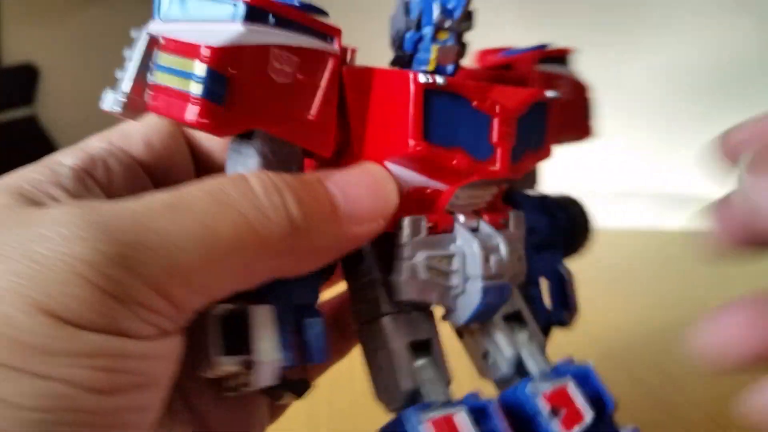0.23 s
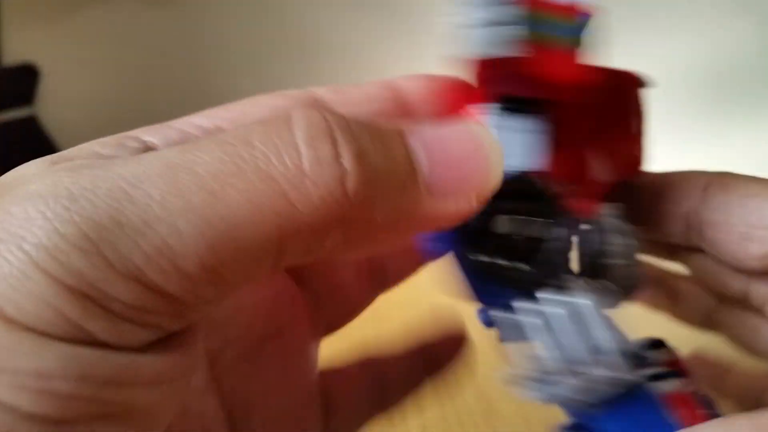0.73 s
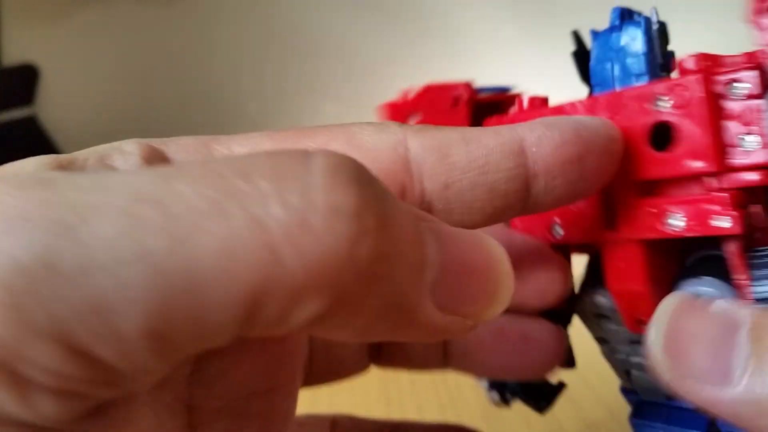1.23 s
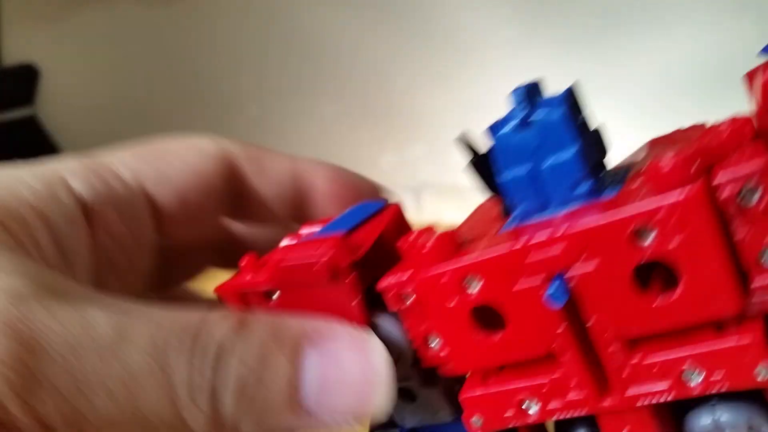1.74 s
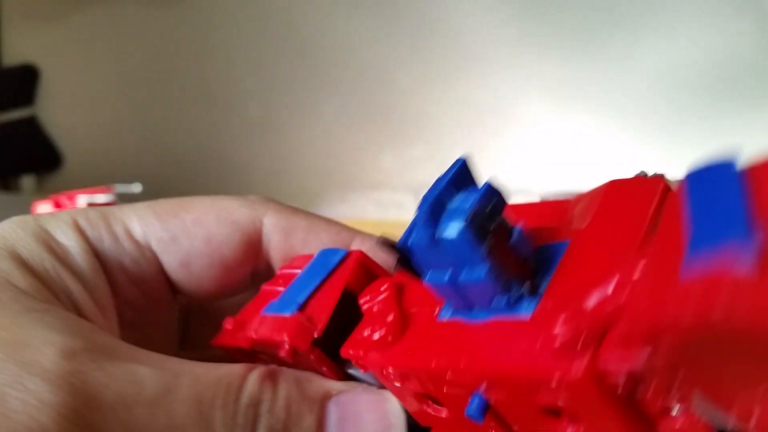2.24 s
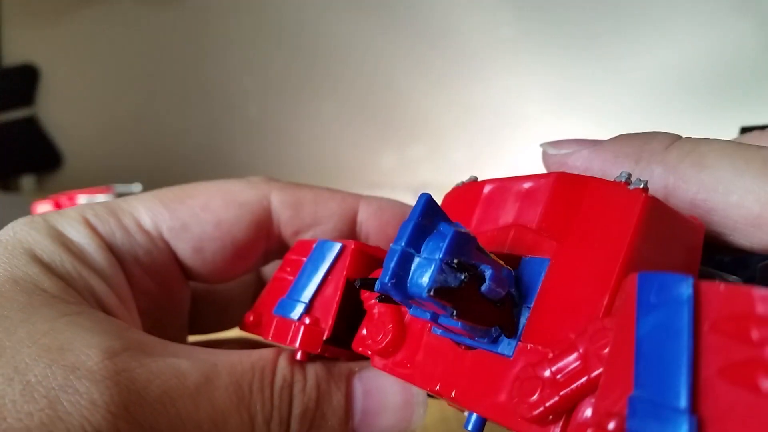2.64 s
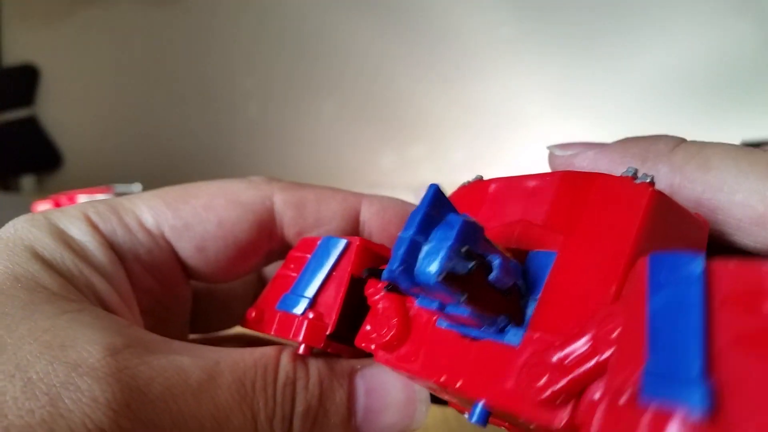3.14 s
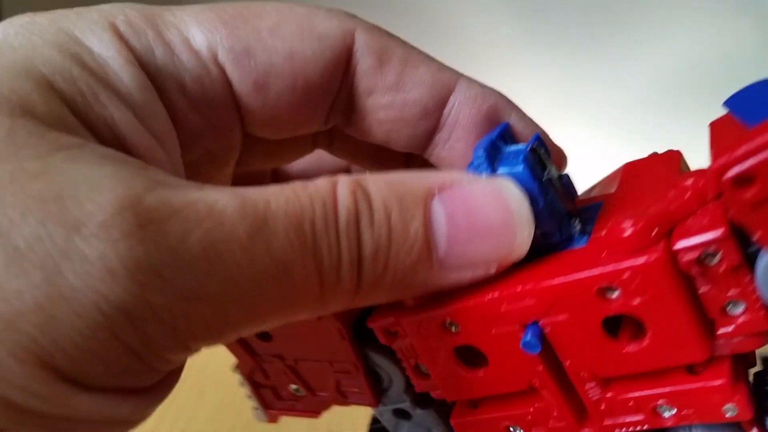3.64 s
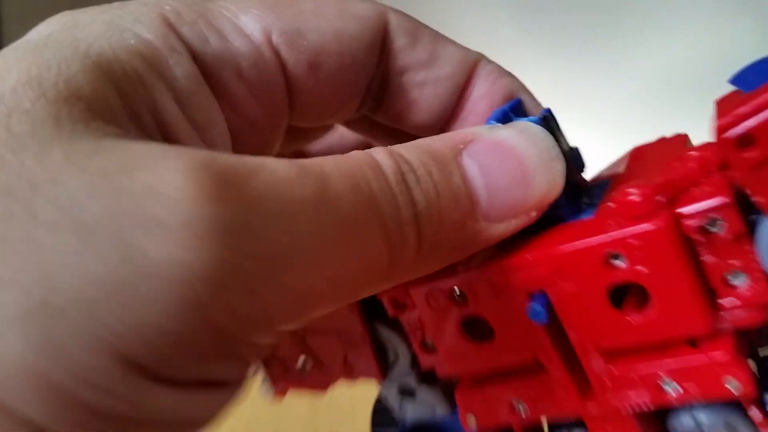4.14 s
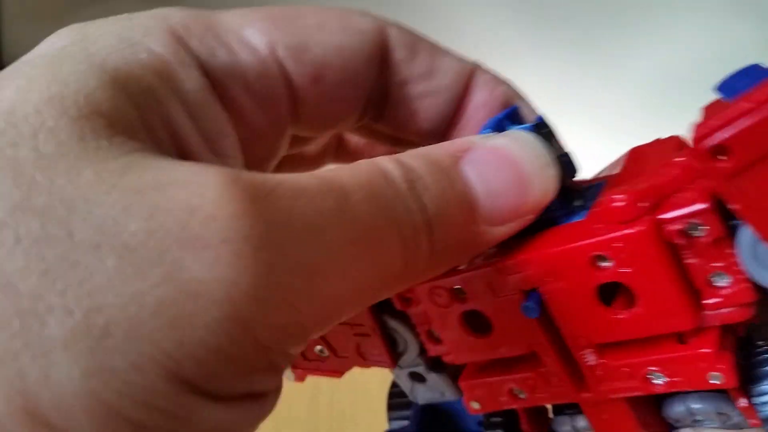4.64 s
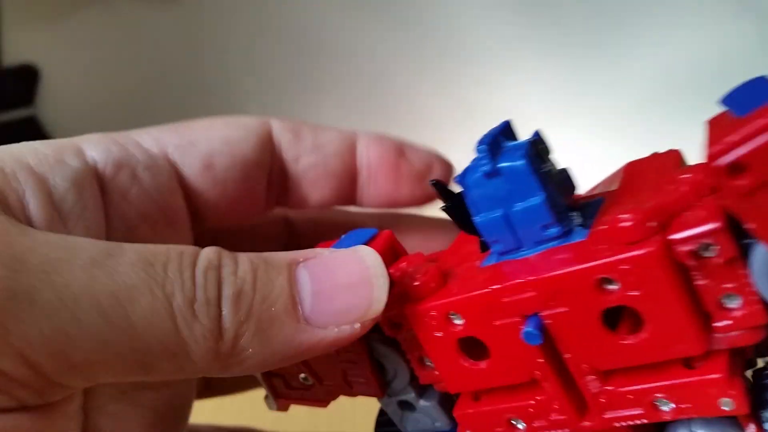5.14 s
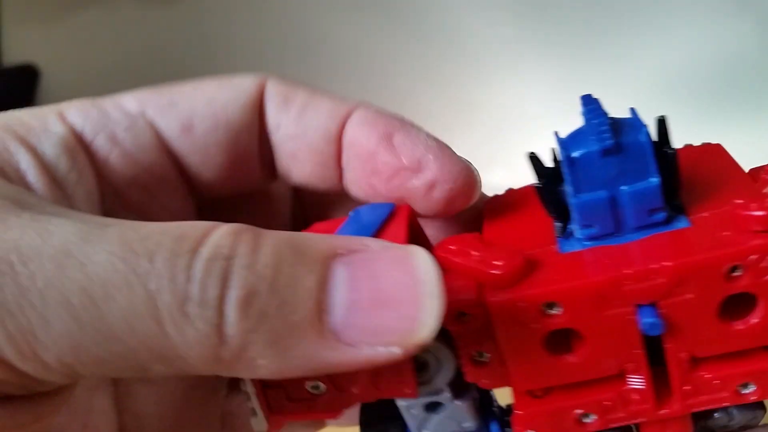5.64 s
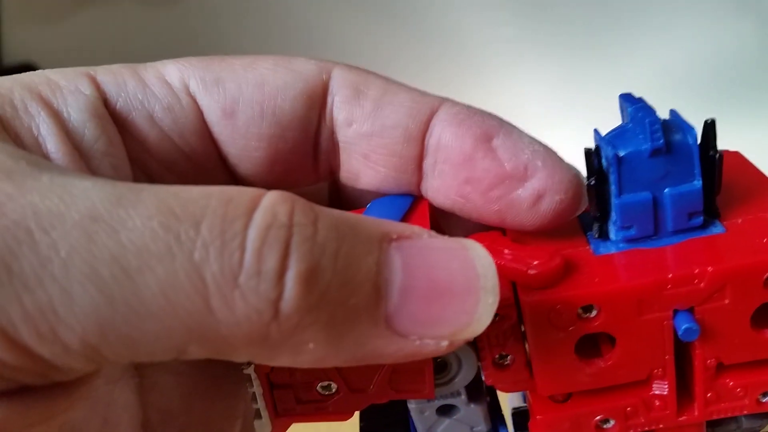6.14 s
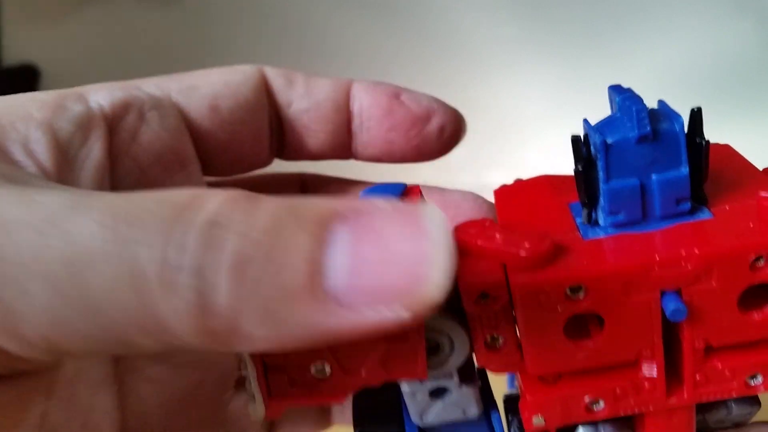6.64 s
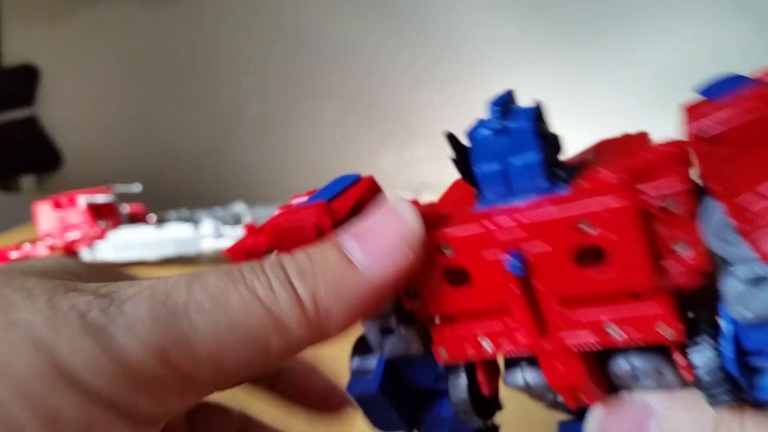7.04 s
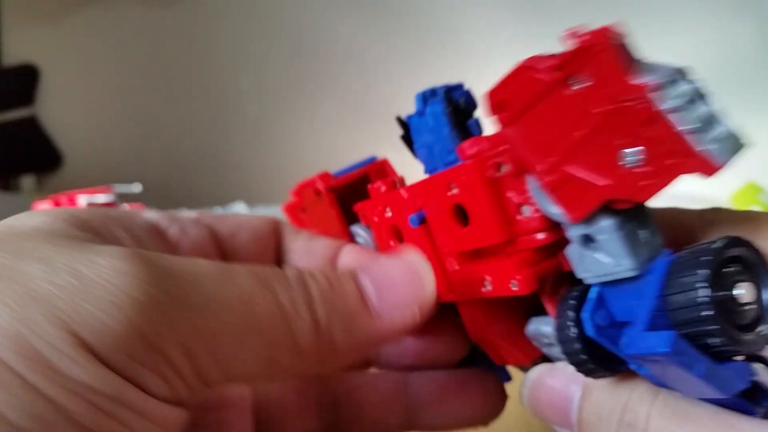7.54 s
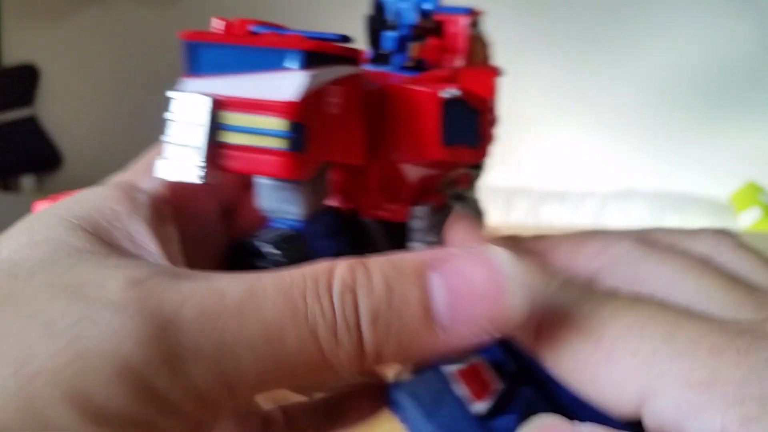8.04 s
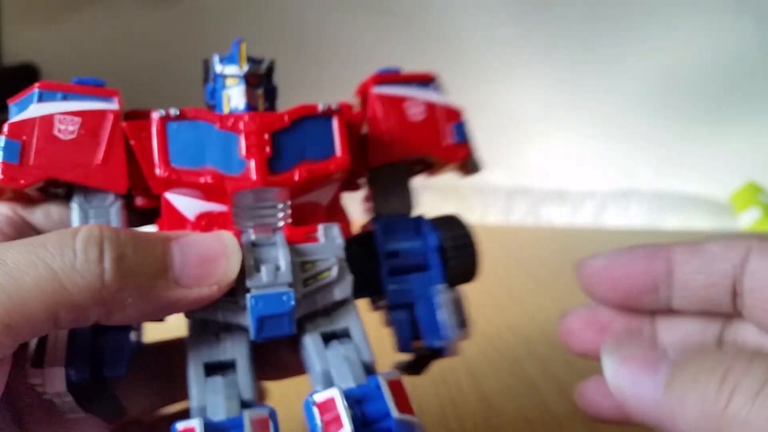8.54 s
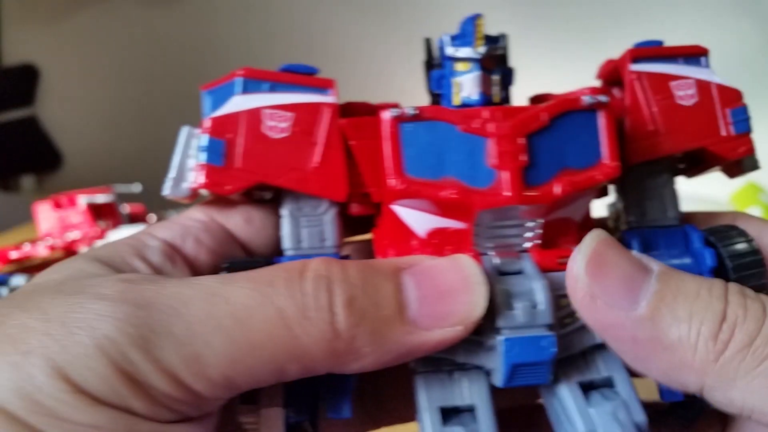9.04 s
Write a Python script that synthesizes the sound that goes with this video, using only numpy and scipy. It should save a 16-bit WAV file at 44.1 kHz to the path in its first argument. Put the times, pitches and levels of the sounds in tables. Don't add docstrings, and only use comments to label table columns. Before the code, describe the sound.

Very close handling of a hollow plastic toy figure over a wooden table in a small room. From 0 to 0.9 s it is busy: a strong knock at once, then a cluster around 0.3-0.75 s, with bright clicks, rattling parts, rubbing and a tiny squeak. From 1 to 1.7 s lighter plastic ticks and softer bumps follow. Between 1.8 and 3.8 s it is nearly quiet, with faint muffled ticks. Dull wooden thumps with a tiny rebound come at 3.9, 4.3 and, hardest, 4.6 s. At 5.05-5.35 s there are a bump and crisp clicks, then sparse ticks. Around 7-7.35 s joints click and creak faintly. A sharp knock at 7.75 s starts a second flurry of knocks, scrapes and rattles until about 8.7 s, settling into small ticks and light rubbing to the end near 9.3 s. Low distant rumble, hum and soft microphone hiss continue throughout.

```python
import sys
import numpy as np
from scipy import signal
from scipy.fft import rfft, irfft, next_fast_len
from scipy.io import wavfile

SR = 44100
rng = np.random.default_rng(int(sys.argv[2]) if len(sys.argv) > 2 else 0)


def boost_factor(decibels):
    exponent = np.asarray(decibels, float) / 20
    return 10 ** exponent


def waveform_to_disk(signal):
    frames = np.transpose(np.atleast_2d(signal))
    scaled = np.clip(frames, -1, 1) * 32767
    samples = np.round(scaled).astype(np.int16)
    wavfile.write(sys.argv[1], SR, samples)


N = 409248

# (frequency [Hz], level [dB], t60 [s])
TABLE_MODES = [(201, -15, 0.2), (230, 0.5, 0.13), (301, 3, 0.19), (345.8, -0.5, 0.21), (396.3, -4, 0.26),
               (447.6, -1.5, 0.14), (487.6, -7.5, 0.31), (627, 0.5, 0.13), (732, 5, 0.031),
               (803, -1, 0.077), (930, -6.5, 0.034), (1090, -12.5, 0.058), (1230, -12, 0.098),
               (1400, -17, 0.035)]


def rms_one(x):
    return x / np.sqrt(np.mean(x ** 2) + 1e-20)


def in_time(rows):
    s, *columns = np.transpose(rows)
    return [np.interp(np.arange(N) / SR, s, column) for column in columns]


def at_hz(points, hz):
    point_hz, values = np.array(points)[:, 0], np.array(points)[:, 1]
    return np.interp(np.log(hz), np.log(point_hz), values)


def band(x, low_hz, high_hz, order=2):
    edges_hz = [low_hz, min(high_hz, .45 * SR)]
    return signal.sosfilt(signal.butter(order, edges_hz, "band", fs=SR, output="sos"), x)


def drift(rate_hz):
    r = np.exp(-80 * np.pi * rate_hz / SR)
    slow = signal.lfilter([1], [1, -2 * r, r * r], rng.standard_normal(N // 40 + 2002))[2000:]
    return np.interp(np.arange(N) / 40, np.arange(len(slow)), rms_one(slow))


def decay(t, t60_s):
    return boost_factor(-60 * t / t60_s)


def onset(t, rise_s):
    return 1 - np.exp(-t / rise_s)


def ring(force, hz, t60_s):
    r, w = boost_factor(-60 / (max(t60_s, .003) * SR)), 2 * np.pi * hz / SR
    return signal.lfilter([0, np.sin(w)], [1, -2 * r * np.cos(w), r * r], force + 1e-18)


def struck(modes, strength_db, damping, t):
    hz, level_db, t60_s = np.transpose(modes)[:, :, None]
    heights = boost_factor(level_db + strength_db[:, None] - 60 * t / (t60_s * damping))
    sound = np.sum(heights * np.sin(2 * np.pi * hz * t), axis=0)
    return sound / np.abs(sound).max()


def convolve(x, answer):
    return signal.fftconvolve(x, answer[None], axes=1)[:, :x.shape[1]]


def add(out, s, sound, pan_db):
    at = round(s * SR)
    panned = boost_factor([[pan_db / 2], [-pan_db / 2]]) * sound
    out[:, at:at + sound.shape[-1]] += panned[:, :N - at]


def all_knocks():
    # (time [s], peak [dB], crack above the knock [dB], strongest ring [Hz])
    single = [(0.0746, -8, -22.5, 804), (0.323, -25, -17.5, 307), (0.438, -14, -23, 480),
              (0.533, -24.5, -12.5, 340), (0.557, -21.5, -22, 750), (0.585, -19.5, -20, 800),
              (0.658, -12, -21, 525), (0.7, -16, -29, 327), (0.744, -46, -4, 303), (1.256, -30.5, -39, 326),
              (1.339, -47, -9, 293), (1.645, -27, -21, 312), (2.149, -38, -22, 308),
              (5.053, -17.5, -38, 324), (5.272, -24, -36, 297), (5.687, -32, -37, 462),
              (5.789, -31, -46, 465), (6.822, -29.5, -37.5, 240), (7.169, -29, -30, 303),
              (7.7425, -10.5, -35, 442), (8.01, -22, -20, 750), (8.365, -20.5, -27.5, 740),
              (8.433, -29, -16, 730), (8.464, -22, -19.5, 780), (8.71, -27, -32, 730)]
    # (time [s], peak [dB], strongest ring [Hz])
    bumps = [(.023, -29, 301), (.157, -33, 458), (.296, -36, 390), (0.403, -43, 280), (0.503, -34, 374),
             (0.64, -24, 626), (0.333, -31.5, 1400), (0.811, -30, 304), (0.862, -26, 800), (.899, -23, 627),
             (0.999, -37, 500), (7.851, -30, 490), (7.912, -26.5, 627), (7.957, -17, 700),
             (7.968, -22, 800), (7.805, -33, 320), (7.765, -34, 300), (7.985, -28, 795), (7.999, -22, 765),
             (8.036, -37, 310), (8.087, -45, 619), (8.183, -39, 730), (8.226, -23.5, 479),
             (8.237, -26.5, 783), (8.254, -22, 596), (8.277, -23, 714)]
    # (time [s], peak [dB])
    rocks = [
        (3.895, -17.5),
        (4.269, -16),
        (4.58, -10),
    ]
    bump_crack_db = -37
    heel_hz, heel_crack_db, bounce_s, bounce_db = 374, -35.5, .061, -16.5
    small = [(s, db, bump_crack_db, hz) for s, db, hz in bumps]
    heel = [(s + k * bounce_s, db + k * bounce_db, heel_crack_db, heel_hz)
            for s, db in rocks for k in range(2)]
    return single + small + heel


def knocks():
    # (frequency [Hz], level [dB], t60 [s])
    joint_modes = [(2110, 0.5, 0.0089), (3500, -5.5, 0.029), (4130, 0.5, 0.006), (5680, -11.5, .01),
                   (6720, -4, 0.011)]
    push_hz, push_follows = 560, .5001
    knock_delay_s = .003
    out, t = np.zeros((2, N)), np.arange(SR // 5) / SR
    events = all_knocks()
    chance = rng.standard_normal((len(events), len(TABLE_MODES)))
    joints = struck(joint_modes, np.zeros(len(joint_modes)), 1, t[:SR // 40])
    for (s, peak_db, crack_db, hz), spread in zip(events, chance):
        sinking_s = (t - .0012) * max(hz / 400, 1) ** push_follows
        push = np.sin(2 * np.pi * push_hz * sinking_s - .35) * np.exp(-(sinking_s / 0.00064) ** 2)

        modes = np.array(TABLE_MODES + [(hz, 1.5, .028)])
        apart_db = -4 * np.abs(np.log2(modes[:, 0] / hz))
        uneven_db = np.append(2.5 * spread, 0)
        wood = band(-struck(modes, apart_db + uneven_db, 1.22, t), 196, 2000) * onset(t, .0016)

        shiver = rng.standard_normal(len(t)) ** 3 * decay(t, 0.094)
        shiver = signal.fftconvolve(shiver, wood * decay(t, 0.09))[:len(t)]
        shiver = shiver / np.abs(shiver).max()

        clumps = boost_factor(2.0 * rng.standard_normal(len(t) // 90 + 1)).repeat(90)[:len(t)]
        jolts = rng.standard_normal((2, len(t))) * clumps * decay(t, 0.15) * onset(t, 0.0052)
        rattle = 0.17 * convolve(jolts, joints) + band(jolts, 900, 4760, order=3)
        rattle = boost_factor(crack_db + 5.5) * rattle * [[.7], [1.4]]

        knock = boost_factor(peak_db) * (0.81 * push + 0.5 * wood + 0.27 * shiver + rattle)
        add(out, s + knock_delay_s, knock, 5.4 + 4.0 * np.log2(hz / 300))
    return out


def all_ticks():
    # (time [s], peak [dB], strongest ring [Hz])
    swing = [(0.0576, -37, 2000), (0.328, -27, 2080), (0.33, -32, 3970), (0.742, -35, 2280),
             (7.793, -39, 3900), (0.38, -22.5, 3500), (0.4413, -26, 3710), (0.551, -33, 3500),
             (0.557, -28, 2320), (0.563, -19.5, 3000), (0.6604, -18.5, 4020), (0.745, -29, 3800),
             (0.851, -54, 1740), (0.899, -37, 1740), (0.976, -36.5, 1990), (1.001, -38, 2600),
             (7.923, -43, 1500), (8.2532, -44, 1870), (8.276, -35, 1840), (1.028, -38, 2020),
             (1.213, -54, 1950), (1.062, -27.5, 3430), (1.276, -30.5, 3220), (1.3073, -36, 2030),
             (1.3862, -37.5, 2240), (1.4576, -27, 1950), (1.5367, -31, 2100), (1.6553, -30, 1960),
             (1.835, -49.5, 1950), (7.747, -26.5, 3830), (8.13, -29.5, 2920), (7.96, -30, 3270),
             (7.973, -27, 4020), (8.001, -30, 3500), (8.034, -36, 1950), (8.319, -29.5, 2800),
             (8.3478, -26, 4030), (8.443, -48, 3610), (8.468, -37, 1880), (8.609, -42, 1290),
             (8.713, -38.5, 1930), (9.1027, -47, 2060), (9.151, -45.5, 2000)]
    # (time [s], peak [dB], strongest ring [Hz])
    held = [(2.101, -53, 1960), (2.1186, -45, 2980), (2.165, -55, 3500), (2.398, -60, 2020),
            (2.435, -56, 2130), (2.473, -57, 2100), (2.539, -63, 2000), (4.383, -52, 2150),
            (4.646, -43, 2100), (7.002, -48, 3900), (3.3147, -47.5, 1950), (3.317, -44.5, 2880),
            (5.186, -46, 3260), (7.203, -38, 3000), (2.153, -47, 2930), (4.2822, -45, 1450),
            (4.936, -54, 1980), (5.157, -41.5, 3600), (5.344, -25.5, 3240), (5.52, -50, 2250),
            (5.574, -46, 2180), (5.613, -44, 2100), (5.68, -41, 3320), (5.694, -44, 3350),
            (6.6786, -51.5, 3570), (7.0405, -37, 3500), (7.1525, -39.5, 2070), (7.207, -41, 2120),
            (7.252, -38, 2220), (7.3, -36, 2000), (7.3, -30, 3430), (7.344, -37, 3120)]
    # (time [s], peak [dB], strongest ring [Hz], crack [dB])
    snaps = [(0.296, -42, 3820, -19), (0.5194, -31.5, 2780, -11), (0.535, -30, 3060, -10),
             (0.589, -26, 3900, -18), (0.701, -18.5, 3900, -24), (0.951, -35.5, 1870, -19),
             (1.339, -26, 2400, -22), (1.715, -35.5, 2130, -7), (2.152, -44, 1950, -15),
             (2.2133, -43.5, 2470, -11), (2.294, -40.5, 3100, -18), (2.342, -47.5, 1950, -25),
             (2.359, -48, 2120, -18), (2.498, -57, 2220, -15), (8.045, -36, 4070, -25),
             (8.333, -32, 3980, -25), (6.772, -39.5, 2800, -24), (6.795, -40.5, 2040, -17),
             (7.7775, -33.5, 3760, -9), (7.958, -35.5, 1730, -7.5), (8.119, -39, 1980, -12),
             (8.6965, -46, 2600, -18)]
    # (time [s], peak [dB], strongest ring [Hz], crack [dB], thin panels [dB])
    panel = [(0.082, -17, 2600, -18, 14), (0.179, -32.5, 2040, -8.5, 17), (1.641, -36.5, 2470, -2, -23),
             (3.9074, -55, 3460, -38, -17), (4.5976, -44, 3500, -14, -11), (4.653, -38, 3760, -31, 13),
             (4.273, -52, 3820, -42, -10), (4.584, -37, 3900, -37, 0), (3.898, -59, 3840, -40, -18),
             (5.057, -38, 3500, -26, -21), (5.1814, -31, 2330, -35, -13), (6.988, -44, 4060, -37, -11),
             (7.276, -44, 2710, -29, -21), (8.088, -35, 2070, -33, 8), (8.185, -34.5, 3500, -32, 14),
             (8.486, -31.5, 3500, -39, -2)]
    swing_crack_db, swing_thin_db = -27, -34
    held_crack_db, held_thin_db = -33, -26
    snap_thin_db = -9
    return ([(*row, swing_crack_db, swing_thin_db) for row in swing]
            + [(*row, held_crack_db, held_thin_db) for row in held]
            + [(*row, snap_thin_db) for row in snaps] + panel)


def ticks():
    # (frequency [Hz], level [dB], t60 [s])
    shell_modes = [(1400, 5, 0.041), (1950, 1, 0.16), (2220, 6, 0.037), (2600, 6, 0.06), (2980, 3.5, 0.099),
                   (3350, 12.5, 0.024), (3900, 9.5, 0.027), (4400, -13, 0.04), (5050, -26, 0.0099),
                   (5630, -16, 0.02), (6320, -17, 0.0099), (6950, -28, 0.015)]
    own_ring_t60_s, own_ring_db, damping = .055, 7.5, .33
    chatter_gain, chatter_t60_s, crack_t60_s = .18, .04, .022
    out, t = np.zeros((2, N)), np.arange(SR // 12) / SR
    events = all_ticks()
    chance = rng.standard_normal((len(events), 2, len(shell_modes)))
    for (s, peak_db, hz, crack_db, thin_db), (spread, detune) in zip(events, chance):
        modes = np.array(shell_modes + [(hz, 2.5, own_ring_t60_s)])
        modes[:-1, 0] *= 1 + 0.025 * detune
        near_pitch_db = -7 * np.abs(np.log2(modes[:, 0] / hz))
        apart_db = np.where(modes[:, 0] < 4800, near_pitch_db, thin_db + 19.0)
        ringing = struck(modes, apart_db + np.append(2.7 * spread, own_ring_db), damping, t)

        noise = rng.standard_normal((3, 2, len(t)))
        contact = (noise[0] + 0.2 * noise[0, 0]) ** 3
        contact = contact * decay(t, 0.027) * onset(t, 0.00032)
        body = band(convolve(contact, ringing), 1300, 7550, order=3)
        body = body / np.abs(body).max()

        chatter = chatter_gain * band(noise[1], 1700, 5600, order=3) * decay(t, chatter_t60_s)
        crack = band(noise[2], 14300, 23000) * [[.8], [4.0]] + band(noise[2], 7700, 14900) * [[1.1], [1.5]]
        crack = boost_factor(crack_db + 6) * crack * decay(t, crack_t60_s) * onset(t, 0.00061)
        add(out, s, boost_factor(peak_db) * (body + chatter + crack), 9.0 - 4.6 * np.log2(hz / 2000))
    return out


def slips(per_s, uneven_db):
    sizes = boost_factor(uneven_db * np.minimum(rng.exponential(1, N), 4)) * rng.choice([-1, 1], N)
    return sizes * (rng.random(N) < per_s * boost_factor(2.5 * drift(30)) / SR)


def rubbed(modes, per_s, uneven_db, damping):
    patchy_db, patches_hz = 3.2, 9
    shared = [slips(per_s, uneven_db), slips(per_s, uneven_db)]
    total = np.zeros(N)
    for k, (hz, db, t60_s) in enumerate(modes):
        gain = boost_factor(db + patchy_db * drift(patches_hz)) / np.sqrt(t60_s)
        total += gain * ring(shared[k % 2], hz, t60_s * damping)
    return rms_one(total)


def fidgeting():
    # (time [s], feet on the table [dB], fingers on the shell [dB])
    hands = [(0.0, -43, -51.5), (0.45, -44.5, -63.5), (1.06, -47, -60), (1.32, -54.5, -61.5),
             (1.65, -50, -62), (1.89, -56.5, -69), (2.71, -57, -71.5), (3.7, -59.5, -71), (4.08, -54, -68),
             (5.01, -55, -69), (5.86, -57, -70), (6.74, -54, -73.5), (7.5, -56.5, -67.5),
             (7.85, -41.5, -55), (8.3, -52, -54), (8.5, -53.5, -63.5), (8.81, -49.5, -61),
             (9.28, -52.5, -66.5)]
    feet_share = 0.38
    hiss_db, hiss_follows = -77.5, 0.71
    feet_db, fingers_db = in_time(hands)
    scuff_db = feet_share * feet_db + (1 - feet_share) * fingers_db
    return feet_db, scuff_db, fingers_db, hiss_db + hiss_follows * (fingers_db + 57.5)


def strokes():
    # (time [s], length [s], table drag [dB], scuff [dB], shell rub [dB])
    slides = [(0.042, 0.19, -42, -68, -52), (0.511, 0.1, -35, -43.5, -42), (0.613, 0.16, -37, -41, -45.5),
              (0.763, 0.094, -39, -53, -58), (0.817, 0.22, -41, -40, -44),
              (1.247, 0.13, -41.5, -48.5, -49.5), (1.456, 0.15, -50.5, -51, -54),
              (2.892, 0.17, -51, -72.5, -91), (5.17, 0.82, -46, -56.5, -69.5),
              (5.474, 0.5, -61, -61, -64.5), (6.913, 0.22, -51.5, -50, -70),
              (7.006, 0.45, -48.5, -56.5, -62.5), (7.689, 0.069, -51, -43.5, -62),
              (7.735, 0.074, -33, -54, -52), (7.902, 0.15, -47, -34.5, -42.5),
              (7.957, 0.1, -36.5, -37, -43), (8.103, 0.1, -65, -45.5, -49),
              (8.168, 0.26, -42, -39.5, -48.5), (8.419, 0.087, -46.5, -49.5, -62),
              (8.673, 0.15, -70, -45, -61)]
    hiss_db, hiss_follows = -88.5, 1
    power = np.zeros((4, N))
    for s, length_s, *levels_db in slides:
        at, swell = round(s * SR), np.hanning(round(length_s * SR)) ** 0.92
        levels_db.append(hiss_db + hiss_follows * (levels_db[-1] + 58.5))
        power[:, at:at + len(swell)] += boost_factor(levels_db)[:, None] ** 2 * swell
    return power


def above_still(level_db, still_db):
    return np.sqrt(np.maximum(boost_factor(level_db) ** 2 - boost_factor(still_db) ** 2, 0))


def handling():
    # (drag [dB], scuff [dB], rub [dB], hiss [dB])
    rest_db = (-58, -68.5, -71.5, -86)
    # (frequency [Hz], level [dB per Hz])
    grain = [(530, -30), (900, 0), (1060, -16.5), (1300, -11.5), (1660, -12), (2140, -3), (2370, -10.5),
             (2750, -8.5), (3930, 0), (5120, -48), (5840, -29), (7040, -42), (7740, -25), (8500, -37),
             (11000, -71), (18700, -120)]
    sway_hz, sway_db, sway_t60_s = 82.7, -9, 0.92
    fidget = [above_still(level_db, still_db) for level_db, still_db in zip(fidgeting(), rest_db)]
    drag, scuff, rub, hiss = np.sqrt(np.square(fidget) + strokes())
    flicker = drift(13)
    sway = drag * boost_factor(sway_db) * rms_one(ring(rng.standard_normal(N), sway_hz, sway_t60_s))
    drag = drag * boost_factor(2.1 * flicker) * rubbed(TABLE_MODES[:7], 900, 2.5, 0.46)
    scuff = scuff * boost_factor(0.58 * flicker) * rubbed(TABLE_MODES[7:], 1500, 4.3, 0.5)
    panels = [(hz, at_hz(grain, hz), 42 / hz) for hz in np.geomspace(1100, 8000, 24)]
    near, far = rubbed(panels, 1800, 2.7, 1), rubbed(panels, 1800, 3.4, 0.33)
    rub = rub * boost_factor(2.9 * flicker) * np.array([near, 0.087 * near + 0.67 * far])
    hiss = hiss * boost_factor(1.2 * flicker) * rms_one(band(rng.standard_normal((2, N)), 8600, 21000))
    low = sway + drag * boost_factor([[2.2], [-2.2]]) + scuff * boost_factor([[4.0], [-7.0]])
    return low + rub * boost_factor([[2.4], [-2.4]]) + hiss * boost_factor([[-1.5], [3.0]])


def squeaks():
    # (time [s], length [s], frequency [Hz], level [dB])
    joint_squeaks = [(0.612, 0.045, 3000, -47), (0.63, 0.03, 2000, -51), (.635, .025, 650, -38),
                     (.74, .014, 1350, -47), (1.304, .04, 2130, -54), (4.605, 0.04, 3500, -60),
                     (6.965, 0.05, 3550, -65), (6.98, .04, 4950, -70), (7.03, .04, 3400, -63),
                     (7.05, 0.06, 3000, -62), (7.125, 0.09, 3000, -60), (7.215, .03, 3000, -64),
                     (7.12, .1, 2020, -66), (7.93, .05, 1300, -42), (8.085, 0.06, 2050, -62),
                     (1.46, .06, 1950, -56), (1.54, .05, 2080, -56), (8.68, .3, 640, -57),
                     (8.22, .08, 630, -41)]
    # (time [s], length [s],
    # frequency [Hz], level [dB])
    scrapes_and_glints = [(0, 0.015, 3830, -58), (.19, 0.049, 4100, -53), (.385, 0.056, 3760, -48.5),
                          (6.96, 0.12, 3800, -64.5), (7.15, 0.083, 4020, -63), (7.77, .04, 3680, -50),
                          (7.99, 0.052, 3600, -63), (8.24, 0.15, 1850, -48.5), (7.925, 0.065, 1340, -40),
                          (.178, 0.01, 6000, -49), (.875, .1, 4230, -55), (1.277, 0.0054, 6530, -71),
                          (1.535, 0.0062, 10800, -58), (1.641, 0.011, 5000, -46.5), (5.157, 0.0049, 6380, -60),
                          (5.183, 0.0051, 5800, -56), (6.794, 0.0117, 8800, -57.5), (7.205, .012, 5700, -63),
                          (7.298, .012, 5500, -74), (6.98, 0.048, 5700, -72), (7.17, 0.024, 5700, -66),
                          (7.915, .06, 5900, -58), (7.93, 0.11, 9500, -59), (7.94, 0.062, 7660, -50.5),
                          (7.996, 0.019, 5730, -46.5), (8.26, 0.068, 3930, -57), (8.484, 0.013, 7240, -50),
                          (8.45, 0.017, 5850, -65)]
    out = np.zeros((2, N))
    for rows, t60_s, graininess in ((joint_squeaks, .1, 1), (scrapes_and_glints, .004, 3)):
        for s, length_s, hz, db in rows:
            swell = np.hanning(round(length_s * SR)) ** .5
            friction = rng.standard_normal(len(swell)) ** graininess
            add(out, s, boost_factor(db) * swell * rms_one(ring(friction, hz, t60_s)), 4.5)
    return out


def room(x):
    t60_s, wall_cut_hz, apart_hz = 0.27, 6600, 480
    lags = [283, 347, 431, 509, 613, 727, 829, 953, 1087, 1213, 1361, 1499]
    size = next_fast_len(N + SR)
    bins = np.arange(size // 2 + 1)
    turn = np.exp(-2j * np.pi * bins / size)
    wall = 1 / (1 + 1j * bins * SR / size / wall_cut_hz)
    answer = np.zeros((2, len(turn)), complex)
    for k, lag in enumerate(lags):
        loop = boost_factor(-60 * lag / SR / t60_s) * wall * turn ** lag
        answer[k % 2] += (-1) ** (k // 2) * loop / (1 - loop)
    echo = irfft(rfft(x.mean(axis=0), size) * answer, size)[:, :N]
    middle = echo.mean(axis=0)
    return middle + band(echo - middle, apart_hz, 19000)


def air():
    # (frequency [Hz], level [dB per Hz])
    colour = [(30, -19.5), (48, 7), (64, -12), (100, 1.5), (170, -6), (450, -15), (1000, -27), (1950, -38),
              (2700, -50.5), (3300, -33.5), (4300, -33), (5200, -59.5), (9000, -66.5), (15000, -52.5)]
    # (frequency [Hz], correlation [-1 to 1])
    likeness = [(60, .99), (130, .97), (290, .86), (500, .55), (800, .25), (1200, .35), (2000, .05),
                (15000, 0)]
    # (time [s], level [dB])
    rumble = [
        (0.0, -52.5),
        (0.62, -46.5),
        (1.34, -54.5),
        (3.69, -60.5),
        (4.16, -52.5),
        (6.93, -58.5),
        (8.22, -49),
        (8.63, -55.5),
        (9.28, -52.5),
    ]
    # (time [s], level [dB])
    sizzle = [(0.0, -53), (0.49, -59), (2.07, -74), (3.57, -80.5), (5.48, -68.5), (6.67, -79.5),
              (7.11, -64), (7.65, -81), (7.96, -52), (8.19, -66), (8.66, -73), (9.28, -71)]
    air_db, sizzle_mean_db, sizzle_follows, sizzle_hz = -51, -76, 0.69, 3000
    hz = np.maximum(np.arange(N // 2 + 1) * SR / N, 10)
    mid, side = rfft(rng.standard_normal((2, N))) * boost_factor(at_hz(colour, hz))
    alike = np.clip(at_hz(likeness, hz), -.95, .99)
    both = np.sqrt(1 + alike) * mid + np.sqrt(1 - alike) * side * [[1], [-1]]
    bass_share = 1 / (1 + (hz / 180) ** 4)
    bass, rest = irfft(both * bass_share, N), irfft(both * (1 - bass_share), N)
    spread = np.std(bass + rest)
    (rumble_db,), (sizzle_db,) = in_time(rumble), in_time(sizzle)
    wavering = boost_factor(.6 * drift(5))
    treble = irfft(both / (1 + (sizzle_hz / hz) ** 8), N)
    rest = rest + treble * (boost_factor(sizzle_follows * (sizzle_db - sizzle_mean_db)) - 1)
    swelling = bass * boost_factor(rumble_db + 55.5) + rest * wavering * boost_factor([[2.5], [-2.5]])
    return boost_factor(air_db) * swelling / spread


def microphone(x):
    # (centre [Hz], width [Hz], depth [dB])
    dip = (8380, 7900, -10)
    hz, width_hz, dip_db = dip
    notched = signal.lfilter(*signal.iirnotch(hz, hz / width_hz, fs=SR), x)
    return band(notched + boost_factor(dip_db) * (x - notched), 70, 19000)


def ports(x):
    turn_rad, flip_hz, flip_width_hz = .47, 1060, 230
    size = next_fast_len(N + SR)
    turned = irfft(rfft(x[1], size) * np.exp(-1j * turn_rad), size)[:N]
    r = np.exp(-np.pi * flip_width_hz / SR)
    poles = [1, -2 * r * np.cos(2 * np.pi * flip_hz / SR), r * r]
    return np.array([x[0], signal.lfilter(poles[::-1], poles, turned)])


def scene():
    room_db = -14.5
    near = knocks() + ticks() + handling() + squeaks()
    return ports(microphone(near + boost_factor(room_db) * room(near)) + air())


def band_limit(x):
    return signal.sosfilt(signal.butter(12, 16820, fs=SR, output="sos"), x)


def record(dry):
    top_cut = signal.cheby2(14, 60, 16250, fs=SR, output="sos")
    mix = signal.sosfilt(top_cut, dry)
    return band_limit(mix)


dry = scene()
out = record(dry)
waveform_to_disk(out)
```